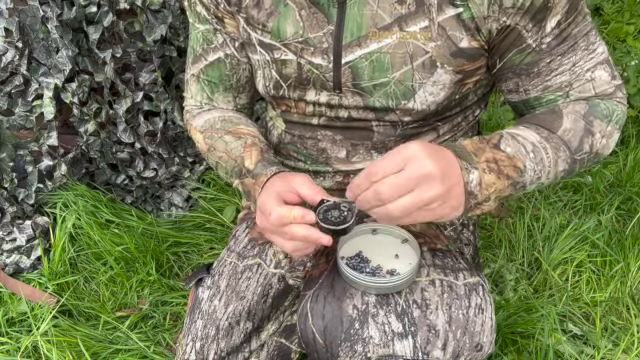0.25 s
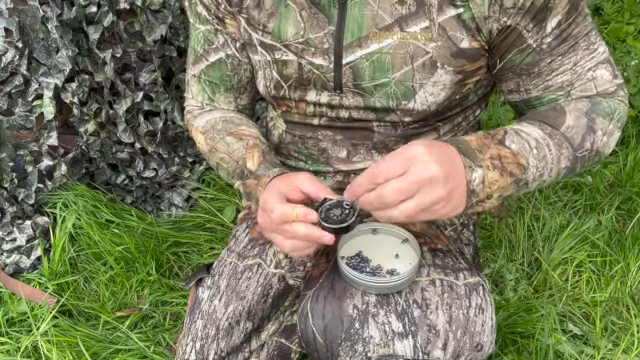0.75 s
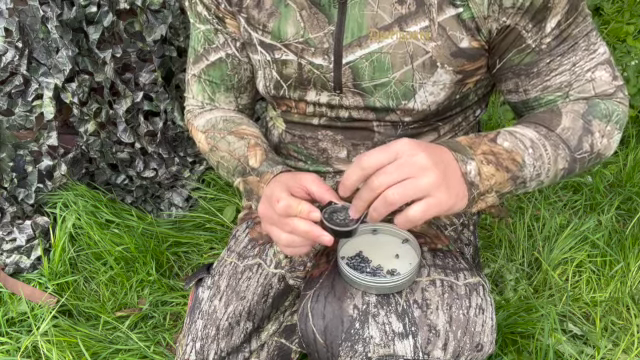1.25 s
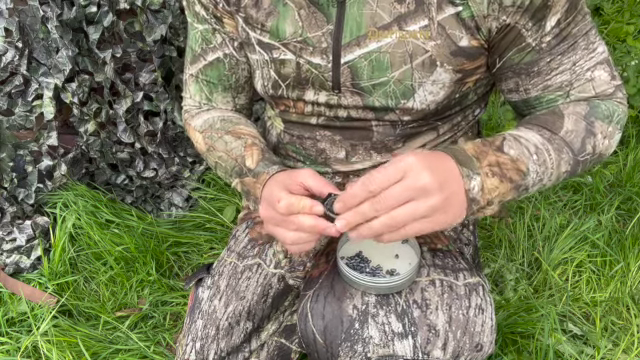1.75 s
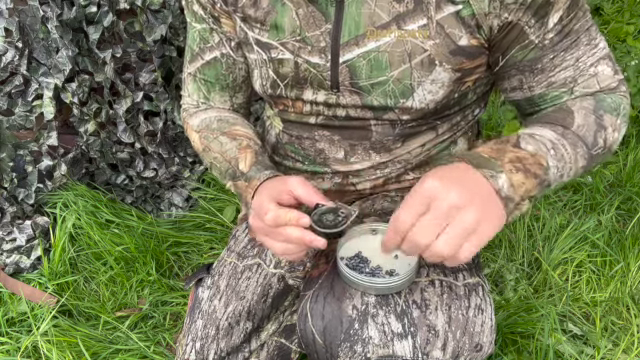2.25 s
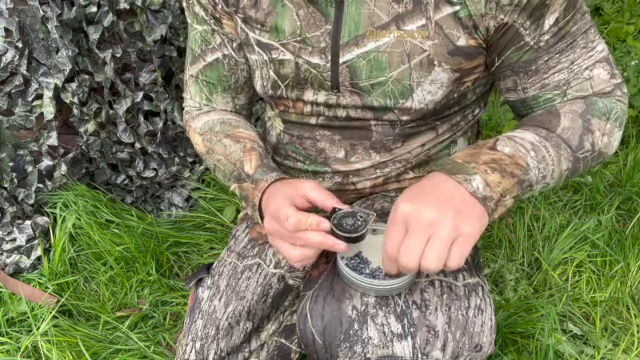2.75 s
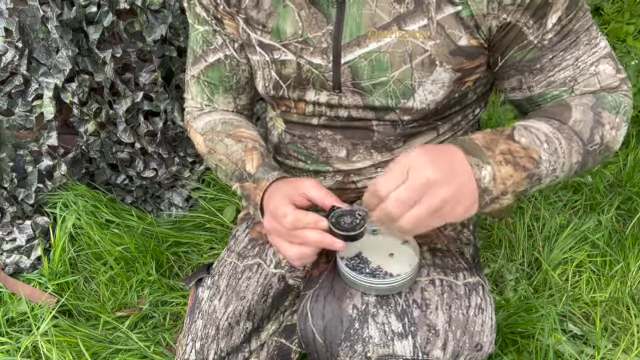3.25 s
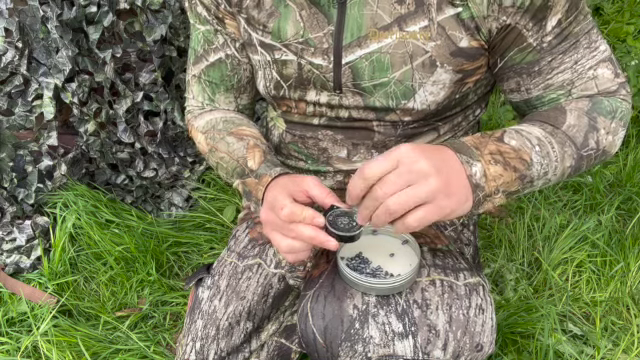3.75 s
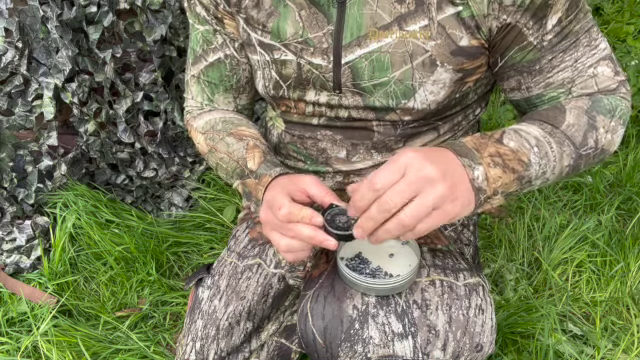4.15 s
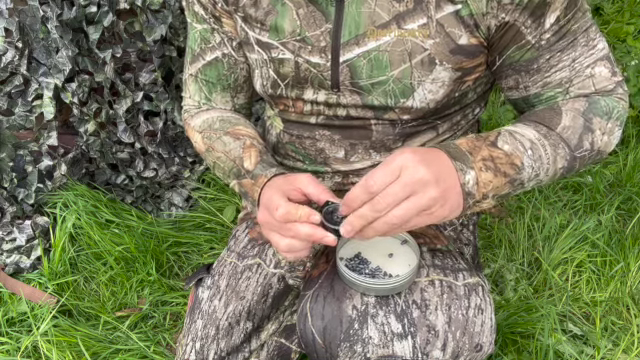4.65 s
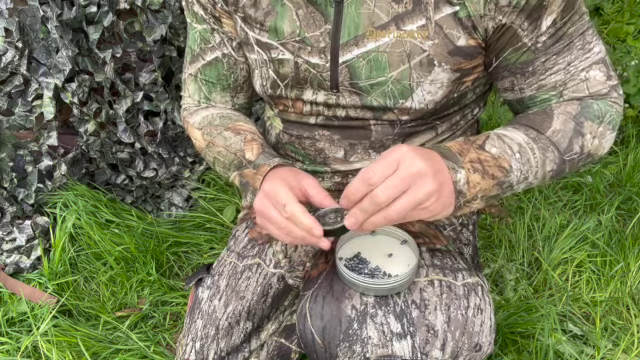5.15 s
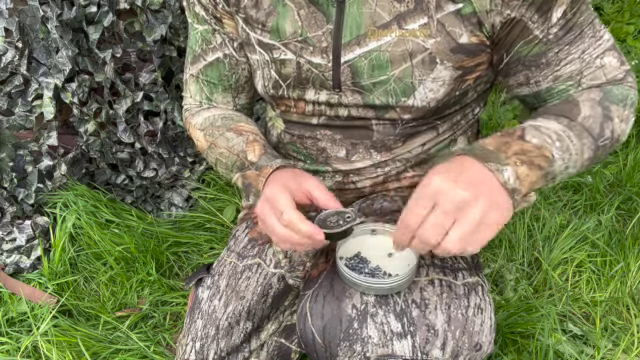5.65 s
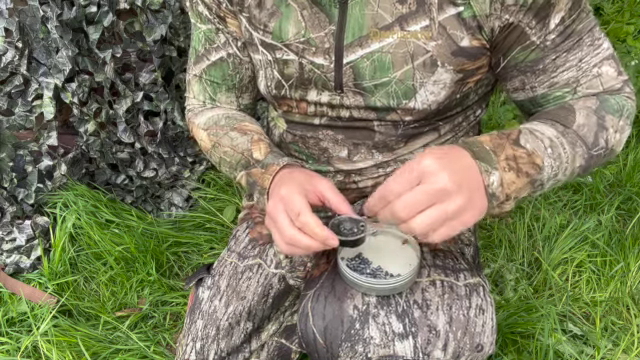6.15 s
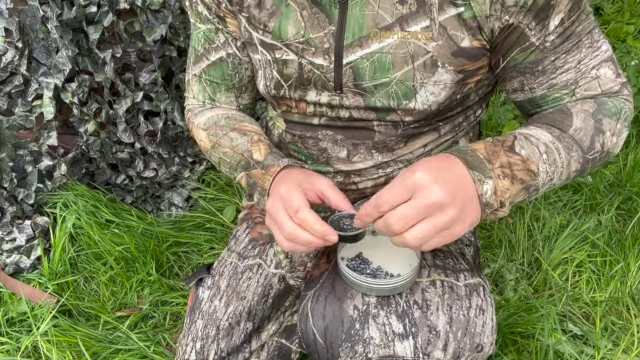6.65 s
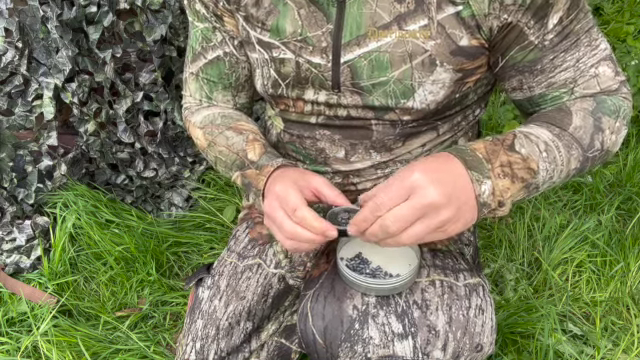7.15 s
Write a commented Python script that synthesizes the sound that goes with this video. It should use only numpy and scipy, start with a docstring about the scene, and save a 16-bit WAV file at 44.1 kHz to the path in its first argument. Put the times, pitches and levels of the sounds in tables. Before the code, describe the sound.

A quiet outdoor countryside scene in stereo, about 7.4 seconds long. Throughout, low wind rumbles softly on the microphone over a faint, broad, distant road hush, while far birds twitter with a diffuse hedge echo. From 0 to 1.3 s a near small bird gives quick chips and short gliding whistles. Around 1.4 s a tight cluster of tiny dry clicks comes from a pellet being pushed into a plastic magazine, alongside trills. Two clear, louder whistles follow at 1.7 and 2.1 s, then trills and faint harsh notes until about 3.3 s. Song thins; light ticks fall near 3.8 s and a sharper click at 4.3 s, with faint chips and a barely audible pigeon cooing from 3.8 to 5.4 s. Faint ticks come near 5.9 to 6.3 s, a crisp cluster at 6.6 s. Bright whistles return from 6.8 s to the end.

```python
"""Small birds sing from a hedge: whistles, trills and chips are gliding near-sines, chatter is sweeps with breath.
A seated person thumbs lead pellets into a plastic magazine: scrape bursts ring its decaying partials.
Far birds twitter in wavering tones, mostly as scattered hedge echoes, and a pigeon coos faintly.
Low shaped noise is wind rumbling on the microphones; broad drifting noise is a distant road hush."""
import sys
import numpy as np
from scipy import signal
from scipy.io import wavfile
from scipy.ndimage import uniform_filter1d

SR = 44100
rng = np.random.default_rng(int(sys.argv[2]) if len(sys.argv) > 2 else 0)


def wav_out(sig):
    """Save sig, one row per channel (or a flat mono array), as 16-bit PCM at SR to the path in sys.argv[1]."""
    wavfile.write(sys.argv[1], SR, np.round(np.clip(np.atleast_2d(sig).T, -1, 1) * 32767).astype(np.int16))


N = 325899

# Whistled notes; turn and loudest are counted from the start, pan is left over right:
# start_s, length_s, turn_s, loudest_s, first_hz, turn_hz, last_hz, level_db, pan_db, left_lead_us
WHISTLE_NOTES = [ (0.0, 0.081, 0.045, 0.037, 2710, 2250, 2130, -50.5, 10, 59),
                 (0.423, 0.033, .015, 0.012, 7280, 7400, 7360, -52.5, 1, -39),
                 (0.509, 0.091, 0.019, 0.026, 6880, 6720, 6790, -59, -9, -2),
                 (0.59, .43, 0.2, 0.069, 6800, 7040, 7190, -74.5, 3.5, -26.5),
                 (0.591, 0.18, 0.16, 0.14, 2146, 2147, 2280, -53.5, 14, -144),
                 (0.831, 0.18, 0.054, 0.14, 2600, 2237, 2204, -51, 12, 87),
                 (0.838, 0.1, 0.032, 0.036, 3750, 3840, 3834, -66, 6.5, 100),
                 (0.886, 0.13, 0.099, 0.17, 1776, 2140, 2140, -43.5, 2, 79),
                 (1.061, 0.071, 0.056, 0.06, 2188, 2222, 2006, -41.5, 4, 54.5),
                 (1.135, 0.043, 0.011, .015, 2160, 2140, 1690, -56, 9, 54),
                 (1.076, 0.046, 0.021, 0.018, 2750, 2630, 2440, -57, 6, -2),
                 (1.14, 0.1, 0.025, 0.022, 3170, 3120, 3050, -64.5, 2, -60.5),
                 (1.073, 0.11, 0.033, 0.018, 3640, 3760, 3420, -70, 3, 2.5),
                 (1.147, 0.11, 0.063, 0.12, 2660, 2535, 2534, -50, 7, -11),
                 (1.213, 0.12, 0.053, 0.058, 2206, 2304, 2030, -42.5, 2.5, 19),
                 (1.334, 0.05, 0.026, 0.038, 4360, 4900, 4700, -54, 4, -29),
                 (1.698, 0.16, 0.038, 0.078, 2455, 2341, 2590, -32.5, -1, 44.5),
                 (2.1, 0.17, 0.031, 0.094, 2380, 2347, 2576, -32, 0, 34),
                 (2.082, 0.24, 0.075, .048, 1995, 1943, 1793, -58, -6, 156.5),
                 (2.289, 0.18, 0.058, 0.22, 1514, 1765, 1925, -59, 2, 144),
                 (2.427, 0.074, 0.037, 0.079, 1962, 2336, 2193, -43, 2.5, 28),
                 (2.463, 0.05, 0.025, 0.03, 3520, 2600, 2450, -49, 2.6, -100),
                 (2.574, 0.17, 0.044, 0.043, 1800, 1655, 1750, -60.5, 3, 167),
                 (2.795, 0.15, 0.098, 0.066, 1870, 2802, 2630, -50, 5.5, -4),
                 (2.949, 0.069, .03, 0.019, 2730, 2588, 2490, -54, 2, -2),
                 (3.003, .13, 0.026, 0.033, 2490, 2426, 2970, -49.5, 4.5, -29),
                 (3.155, 0.054, 0.015, 0.021, 2440, 2397, 2462, -47.5, -6.5, 0),
                 (3.156, 0.055, 0.034, 0.015, 4860, 4790, 4790, -50, 7, -1),
                 (3.196, 0.15, 0.072, 0.056, 4300, 4260, 4080, -68.5, 1, -31),
                 (3.246, 0.092, 0.012, 0.013, 3350, 3630, 3360, -53.5, 5.5, 111),
                 (4.109, 0.065, 0.04, 0.021, 7590, 6660, 5170, -66.5, 1, -55),
                 (4.221, 0.086, 0.041, 0.036, 1910, 2083, 2120, -57, 4, 94),
                 (4.452, 0.091, 0.036, 0.04, 2110, 2213, 2147, -54, 1, 34),
                 (4.571, 0.065, 0.028, 0.038, 2820, 2970, 2180, -59.5, 4, -7),
                 (4.724, 0.2, 0.11, 0.015, 2073, 1970, 1900, -67, 9, -67),
                 (4.961, 0.073, 0.049, 0.045, 2700, 2095, 2360, -69.5, 2, 40),
                 (4.99, 0.097, 0.062, 0.1, 8300, 8700, 7450, -81.5, -2, -7),
                 (5.026, 0.08, 0.037, 0.1, 2420, 3090, 2210, -58.5, 4, -44),
                 (5.084, 0.13, 0.045, 0.068, 7650, 8350, 8550, -76, 0, -8),
                 (5.109, 0.17, 0.11, .03, 2410, 2410, 2430, -76, 11, -1),
                 (5.163, 0.13, 0.079, 0.055, 7600, 8100, 7650, -79, 1, -14),
                 (5.212, .18, .11, .03, 8600, 8450, 9100, -85, 0, -8),
                 (5.598, 0.065, 0.025, .015, 2760, 2160, 1940, -67.5, 3, 13),
                 (5.656, 0.11, 0.048, 0.13, 2020, 2860, 2200, -59, 2, 30),
                 (6.13, 0.13, 0.022, 0.1, 2130, 2474, 1790, -57.5, 8, 87),
                 (6.373, 0.051, 0.03, 0.023, 2600, 2620, 2930, -67.5, 9, 0),
                 (3.157, 0.058, .025, 0.028, 2880, 2810, 2910, -60.5, 7, 0),
                 (3.159, 0.061, .025, .025, 5280, 5250, 5300, -65, 2, -2),
                 (5.08, 0.17, 0.11, .06, 1890, 1794, 1740, -73, 10, 6),
                 (1.215, 0.14, 0.03, 0.042, 4450, 4640, 4320, -77, 4, -3),
                 (1.616, 0.094, 0.025, 0.022, 2750, 2630, 2580, -59.5, 9.5, 2),
                 (6.417, 0.16, 0.023, 0.059, 2436, 2272, 2274, -55.5, 13, 88),
                 (6.154, 0.1, 0.022, 0.069, 2610, 2900, 2080, -61, 0, 7),
                 (6.768, 0.062, 0.0097, 0.053, 1740, 1897, 2090, -52.5, 0, 109),
                 (6.867, 0.072, 0.065, 0.0081, 2680, 1908, 2093, -37.5, 2.5, 55),
                 (6.938, 0.039, 0.025, 0.03, 2060, 2486, 2470, -35.5, -0.5, 51),
                 (0.079, 0.023, 0.0084, .012, 2100, 2120, 2550, -51.5, 12, 92),
                 (0.104, 0.033, 0.013, 0.016, 1980, 2104, 2620, -51, 7, 95),
                 (0.141, 0.026, 0.0099, 0.01, 1990, 2140, 2310, -51, 8.6, 95),
                 (7.146, 0.096, 0.038, 0.039, 4440, 4460, 4360, -77.5, -0.5, 5),
                 (7.134, 0.11, 0.096, 0.11, 2200, 2180, 1967, -40.5, 5.5, 30),
                 (7.342, 0.043, 0.024, 0.048, 2490, 2720, 3100, -43, 6, -80),
                 (7.379, 0.045, 0.011, 0.0046, 2440, 2443, 2410, -33, -1.5, 42), ]
# Trilled notes, the whistle columns and then: beats_per_s, swing_hz (negative turns the arches over), throb (0-1)
TRILL_NOTES = [ (0.21, 0.12, 0.053, 0.067, 3000, 2950, 2680, -53.5, 3, -106, 43.8, -230, 0.24),
               (4.882, 0.09, 0.024, 0.018, 4330, 4000, 4230, -69.5, 2, 42, 70, 60, .6),
               (0.228, 0.12, 0.069, 0.09, 2080, 2514, 2473, -50.5, 7, 70, 166, 35, 0.35),
               (1.306, 0.083, 0.027, 0.076, 2087, 2137, 2330, -42, 3.5, 33, 40.8, 187, 0.49),
               (1.379, 0.054, 0.016, 0.032, 2290, 2380, 2306, -34, -1, -30, 40.7, 47, 0.22),
               (1.38, 0.2, 0.055, 0.1, 3265, 3090, 2940, -44, 2.5, -135, 90.5, 27, .1),
               (1.579, 0.35, 0.05, 0.022, 3060, 2930, 3194, -57.5, 7, -135, 92, 30, .1),
               (1.396, 0.063, 0.015, 0.035, 9300, 8720, 8620, -55.5, -1.5, -11.5, 128, 54, .5),
               (1.472, 0.022, 0.012, 0.0074, 8800, 8700, 8570, -75, -2, -13, 127, 49, .5),
               (1.498, 0.12, 0.059, 0.078, 2440, 2540, 2360, -47.5, 5, 54, 44.7, 39, 0.5),
               (1.494, 0.118, 0.076, 0.041, 1990, 2072, 1892, -41.5, 1.5, 76, 45, 65, 0.59),
               (1.898, 0.13, 0.048, 0.092, 2203, 2145, 2063, -38.5, 1.5, 61.5, 43.5, 73.5, 0.28),
               (2.406, 0.048, 0.029, 0.021, 2696, 3460, 3110, -41, 5, -148, 91, 44, 0.26),
               (2.481, 0.11, 0.053, 0.031, 2103, 2155, 2140, -42, 2.5, 61, 45.7, 135, 0.3),
               (2.503, 0.079, .04, .045, 2700, 3070, 2760, -52.5, 3, -100, 46.7, 262, 0.18),
               (2.63, 0.067, 0.039, 0.018, 2340, 3170, 2850, -40.5, 2.5, -87, 96, 48.5, 0.2),
               (2.668, 0.09, 0.039, 0.085, 1773, 1852, 1730, -49.5, 1, 104, 68.7, 55, 0.27),
               (2.906, 0.12, 0.063, 0.048, 6870, 6500, 6500, -54, -3.5, -44, 425, -190, 0.3),
               (3.041, 0.097, 0.066, 0.015, 6380, 6300, 6150, -53.5, -5.5, -51, 433, -190, 0.32),
               (3.25, 0.11, 0.025, 0.01, 7240, 7070, 7100, -62, -2, -42, 103, 74, 0.52),
               (3.28, 0.13, 0.029, 0.046, 2860, 3090, 2820, -63, 6, 25, 76.3, 100, 0.29),
               (3.638, 0.071, 0.062, 0.02, 3840, 4000, 4050, -65.5, 0, 48, 111, 95, 0.46),
               (3.727, 0.07, 0.013, 0.028, 4000, 3830, 3750, -67.5, 0, 59, 110, 92.6, 0.42),
               (3.93, 0.13, .053, 0.15, 6940, 6700, 6500, -75, 4, -52, 120, 109, .1),
               (4.14, 0.063, 0.013, 0.01, 3770, 3910, 3850, -65.5, -2, 68, 95, 40, .1),
               (4.274, 0.33, 0.051, 0.02, 2013, 1994, 2125, -64.5, 5, 98, 96, 79, 0.27),
               (4.105, 0.41, 0.1, 0.1, 1868, 2487, 2770, -68, 5, -43, 92, 80, 0.59),
               (4.53, 0.097, 0.03, 0.034, 2128, 2088, 2140, -57.5, 3, 62, 44.5, 96, 0.43),
               (5.531, 0.067, 0.02, 0.0097, 4140, 3650, 4490, -52, 6, 109, 114, 80, 0.46),
               (5.589, 0.12, 0.092, 0.015, 2900, 3770, 3760, -56.5, 4, 83, 44, 93, 0.17),
               (6.53, 0.29, 0.082, 0.033, 2210, 2110, 1884, -62.5, 6, 97.5, 99, 40, 0.67),
               (6.605, 0.049, 0.029, .025, 2780, 2700, 2680, -64, 4, 2, 91.4, 50, 0.36),
               (6.815, 0.064, 0.058, 0.012, 2380, 3040, 3170, -44, 4, -51, 84, 50.5, 0.44),
               (7.074, 0.081, 0.019, 0.053, 2036, 2060, 2222, -42, 4.5, 51, 78.5, 100.5, 0.47), ]
# Quick glides; the falling ones bottom out at end_hz and hook back up:
# start_s, length_s, first_hz, end_hz, level_db, pan_db, left_lead_us
CHIP_NOTES = [(.039, 0.011, 4130, 4700, -57.5, 4, 40), (0.074, .012, 3870, 4500, -62, 4, 40),
              (.09, 0.011, 3950, 4730, -57, 6, 40), (0.102, .015, 4070, 4950, -62, 4, 40),
              (0.131, 0.015, 3820, 4340, -58, 4, 40), (0.147, 0.016, 3800, 4360, -58, 6, 40),
              (0.187, 0.039, 3560, 3820, -63, 4, 40), (4.912, .018, 3460, 3600, -70, 0, 40),
              (4.938, 0.024, 3680, 2870, -68.5, 0, 40), (0.401, 0.017, 5180, 5450, -59, 3, -73),
              (0.638, 0.036, 3450, 4170, -75, 9, 46), (0.67, 0.022, 4240, 3200, -72, 3, 42),
              (4.515, .016, 3750, 3380, -56, 3, 92), (4.214, 0.028, 5400, 4720, -65, 1, -70),
              (4.265, 0.028, 4720, 4070, -67, 4, 67), (4.272, 0.03, 3780, 3320, -59, 2, 90),
              (4.356, 0.024, 3750, 3330, -63.5, 3, 71), (4.431, 0.017, 3710, 3460, -61.5, 5, 67),
              (4.461, 0.037, 4140, 4330, -67, 2, 61), (4.492, 0.021, 3750, 3470, -50, 5, 98),
              (4.513, 0.028, 3250, 3060, -59, 4, 68), (4.556, 0.023, 3750, 3280, -60, 5, 74),
              (5.712, .028, 4200, 4290, -62, 5, 85), (5.86, 0.022, 4200, 4400, -71, 1, 43),
              (5.887, 0.024, 4150, 4500, -71, 1, 43), (5.917, 0.023, 4150, 4560, -70.5, 1, 43),
              (5.947, 0.021, 4320, 4500, -70.5, -1, 43), (6.32, 0.019, 3900, 4660, -74, 7, -90),
              (6.346, 0.02, 3240, 4200, -70, 9, 127), (6.419, 0.016, 4200, 4300, -69, 7, -81),
              (6.432, 0.021, 3920, 4750, -75, 7, -81), (6.544, 0.028, 3750, 4700, -71, 3, -88),
              (6.646, 0.028, 3750, 4920, -69, 2, -77), (6.684, 0.022, 3320, 4870, -73, -3, -99.5),
              (6.765, 0.025, 3630, 4660, -65, 7, -104), (6.791, 0.01, 2130, 2730, -42.5, 3, 48),
              (6.801, .012, 2160, 2770, -46, 4, 53), (6.87, 0.035, 3570, 4850, -65, 4.5, -93),
              (7.045, 0.018, 3400, 4120, -69, 7, 101)]
# Fast chatter, and at 1.409 s the rattle of pellets in the magazine: start_s, length_s, centre_hz, sweep_hz (up
# +, down -), syllables_per_s, level_db, breath (0-1)
CHATTER = [(.02, .3, 4180, 1000, 55.2, -67.5, 0.85), (0.412, 0.024, 8060, -1600, 80.5, -70, .5),
           (0.496, 0.044, 6960, -1200, 57.6, -64.5, 0.57), (.765, 0.068, 2280, 999, 63.6, -63.5, 0.27),
           (1.051, 0.13, 3440, -700, 42.4, -68.5, 1), (1.52, 0.08, 4300, 1219.5, 59.8, -70, 0.87),
           (1.659, 0.095, 4400, 1502.5, 60, -71.5, 0.85), (1.899, 0.16, 3190, 902.5, 47, -60.5, 1),
           (2.042, 0.1, 5010, -1000, 58.8, -68, 1), (1.409, 0.07, 5970, 3799, 131, -64, 0.8),
           (4.225, 0.14, 4250, -900, 54, -68, 0.58), (4.44, 0.084, 3940, 898, 49, -68, 0.75),
           (2.641, 0.085, 4760, 1198, 92, -76, 0.68), (3.152, 0.1, 6440, 2007, 107, -69.5, 0.97),
           (3.359, 0.11, 3860, 597, 53.5, -65, 0.88), (6.806, 0.16, 3095, 686.5, 70.7, -58, 0.79),
           (7.069, 0.073, 2840, 598, 82, -62, 0.55), (7.173, 0.1, 5020, 1400, 74, -72.5, 0.85)]
# Faint overtones of every sung tone: multiple, relative_db
SYRINX_OVERTONES = [(2, -45), (3, -54)]
# Harsh calls: start_s, length_s, turn_s, loudest_s, first_hz, turn_hz, last_hz, level_db
HARSH_CALLS = [(2.411, .095, .04, 0.024, 920, 1137, 1038, -65.5),
               (2.634, .075, 0.049, 0.038, 853, 1090, 1030, -76)]
# Upper overtones of the harsh calls: multiple, relative_db
HARSH_OVERTONES = [(4, 0), (5, -9), (6, -14), (7, -13), (8, -13)]
# Pellet ticks, the last three relative to the high ring: start_s, high_peak_db, middle_db, low_knock_db, top_edge_db
PELLET_TICKS = [(1.412, -52, 4, 0, -4), (1.424, -39, -12, -22, -4), (1.4347, -49, -12, -2, -14),
                (1.448, -47.5, 10, 0, -24), (1.469, -45, 6.5, -2, -11), (3.805, -61, 5, 7, -1),
                (3.858, -50.5, 0, 7.5, -35), (3.872, -47, -26, -8, -42), (4.3125, -36.5, -2, -6, -20),
                (4.3177, -53, 7, -2, -33), (4.322, -49, -7, -4, -30), (4.338, -55, 6, 8, -16),
                (5.8334, -67, 10, 1, 1), (5.882, -57, -15, -12, -8), (6.0651, -54, -34, -7, 0),
                (6.0672, -49, 3, 9, -20), (6.082, -61, -5, 14, -6), (6.3007, -62, 2, 6, -30),
                (6.5873, -62, 0, 7, -5), (6.596, -49, -5, -6, -7), (6.5986, -37, -2.5, -9, -14),
                (6.607, -44, -1, -10, -28), (6.6132, -51.5, 5, 6.5, -7)]
# Rings of the plastic magazine, grouped as high, middle, low and top edge: pitch_hz, relative_db, t60_s
MAGAZINE_RINGS = [
    [(6520, 2.5, 0.012), (6780, 9.5, 0.0065), (5400, -9, 0.016), (7430, 12.5, 0.0019)],
    [(3950, -9.5, 0.011), (4280, 2.5, 0.004)],
    [(1150, -19, 0.011), (1820, 11.5, 0.0036), (2370, -9.5, 0.0091), (2990, -13.5, 0.025)],
    [(8860, -3, 0.015), (9370, 7, .004), (11050, -12, 0.0055), (13200, -14, 0.0065)],
]
# Path of the far chorus: time_s, level_db, pitch_centre_hz
CHORUS_PATH = [(0, -63.5, 4206), (0.351, -64.5, 4007), (0.52, -70.5, 3258), (0.8, -70.5, 3055),
               (1.05, -74.5, 3595), (1.298, -65, 3498), (2, -64, 3605), (2.299, -65.5, 3892),
               (2.898, -61, 3479), (3.45, -69, 3808), (3.6, -72, 3890), (4.098, -74, 3795),
               (4.6, -68.5, 3516), (5, -69.5, 3874), (5.453, -73, 4040), (5.902, -71, 3488),
               (6.3, -77, 3690), (6.751, -74, 3750), (7.4, -70.5, 3580)]
# Kinds of far bird: pitch_factor (on the centre), relative_db
FAR_BIRD_KINDS = [(.66, 8.5), (0.781, 2.5), (.88, 3.5), (0.969, -4), (1.028, 6.5), (1.121, -3),
                  (1.251, -7.5), (1.749, -23)]
# Pigeon coos: start_s, length_s, level_db
PIGEON_COOS = [(3.817, 0.24, -74.5), (4.074, 0.16, -69), (4.263, 0.14, -77.5), (4.417, 0.38, -74.5),
               (4.964, 0.15, -71), (5.193, 0.19, -73)]
# Wind rumble colour: frequency_hz, relative_db
WIND_COLOUR = [(12, -51), (20, -24.5), (40, -6.5), (59, 9), (72, -3.5), (140, -16), (220, -26),
               (290, -58.5), (480, -120)]
# Wind strength: time_s, level_db
WIND_GUSTS = [(0, -54), (2.8, -57), (6, -54.5), (6.7, -57), (7.4, -56.5)]
# One gust that knocks higher in pitch: centre_s, spread_s, level_db
WIND_BUFFET = (4.5, 0.063, -63.5)
# Colour of the road hush: frequency_hz, relative_db
HUSH_COLOUR = [(76, -35), (130, -8), (360, -14.5), (593, -11.5), (859, -6), (1090, -5.5), (1700, -15.5),
               (2470, -20.5), (3260, -42.5), (3990, -31.5), (4980, -35), (6820, -33.5), (7770, -40.5),
               (8840, -40.5), (10800, -46.5), (14100, -55.5), (22000, -120)]
# Slow level changes of the hush: time_s, change_db
HUSH_LEVELS = [(0, 1.5), (1.5, 2.5), (3, 0.5)]
# Left-right likeness of the hush: frequency_hz, likeness (-1 to 1)
HUSH_LIKENESS = [(60, 0.37), (130, -0.44), (260, 0.82), (550, -0.29), (1140, -0.61), (2380, -0.034),
                 (4980, -0.44), (10400, 0.92)]
# Left-right tilt of hush and wind: frequency_hz, left_over_right_db
NOISE_BALANCE = [(60, -2), (110, 3.5), (190, -1.5), (330, -1.5), (590, 2.5), (1050, 5), (1860, 4.5),
                 (3310, -3.5), (5860, -1), (10400, 0)]

# Each note swells from RISE_DB below its peak and fades to FADE_DB; higher bends hug the peak longer
RISE_DB, RISE_BEND, FADE_DB, FADE_BEND = -10, 3.3, -6, 1.72
TURN_SHARE = 0.25  # share of a note over which its turn is rounded
HOOK_AT, HOOK_BACK = 0.52, 0.59  # where in a falling chip it turns, and the share of the fall it climbs back
NOTE_EDGE_S = 0.0045
COO_EDGE_HZ, COO_TURN_HZ, COO_TOP_SHARE = 368, 389, 0.62
HUSH_DB = -63.5
HEDGE_T60_S, HEDGE_DB = 0.31, -9.5
TICK_T60_S, TICK_ECHO_DB = 0.045, -2.5  # echoes off the lap and the grass
TOP_EDGE_HZ = 15800


def singers():
    """Near birds: syrinx whistles, trills and chips, plus rattling chatter; one rattle of pellets rides along."""
    out = np.zeros((2, N))
    for *shape, pan_db, lead_us in WHISTLE_NOTES:
        add(out, *note(shaped(*shape), pan_db, lead_us, edge_s=NOTE_EDGE_S))
    for *shape, pan_db, lead_us, beats, swing_hz, throb in TRILL_NOTES:
        add(out, *note(shaped(*shape), pan_db, lead_us, beats, swing_hz, throb, edge_s=NOTE_EDGE_S))
    for s, length, first_hz, end_hz, db, pan_db, lead_us in CHIP_NOTES:
        rows = [(s, first_hz, db), (s + length, end_hz, db)]
        if end_hz < first_hz:
            hook_hz = end_hz + HOOK_BACK * (first_hz - end_hz)
            rows[1:] = [(s + HOOK_AT * length, end_hz, db), (s + length, hook_hz, db)]
        add(out, *note(rows, pan_db, lead_us, edge_s=0.0038))
    for row in CHATTER:
        add(out, *buzz(*row))
    return out


def note(rows, pan_db, lead_us, beats=0, swing_hz=0, throb=0, flutter=0.25, edge_s=0.002):
    """A near sine from the syrinx; trills arch in pitch and throb in level on one beat; moving air flutters it."""
    s, hz, db = np.transpose(rows)
    t = np.arange(s[0], s[-1], 1 / SR)
    beat = 2 * np.pi * beats * np.cumsum(1 + 0.066 * wobble(len(t), span=500)) / SR

    arches = 2 * abs(np.sin(beat / 2)) - 4 / np.pi  # averages zero over a beat
    jitter_hz = (8 + 0.23 * abs(swing_hz) + 0.13 * beats) * wobble(len(t), span=60)
    pitch = np.interp(t, s, hz) + swing_hz * arches + jitter_hz

    throb = np.clip(throb, 0, 1)
    flutter = flutter * np.clip((-34.0 - db.max()) / 20, 0.3, 1.1)  # faint notes come through more air
    level = (1 - throb * np.cos(beat)) / np.sqrt(1 + throb ** 2 / 2)
    level *= 1 + flutter * wobble(len(t), span=150)
    level *= gain_of(np.interp(t, s, db))
    level *= np.clip(np.minimum(t - s[0], s[-1] - t) / edge_s, 0, 1)

    # The left phase runs ahead by the lead time
    turn = 2 * np.pi * (np.cumsum(pitch) / SR + np.outer([1, 0], pitch) * lead_us / 1e6)
    tone = np.sin(turn) + sum(gain_of(over_db) * np.sin(k * turn) for k, over_db in SYRINX_OVERTONES)
    sides = gain_of(np.array([[0.5], [-0.5]]) * pan_db)
    return s[0], np.sqrt(2) * tone * level * sides / np.sqrt(np.mean(sides ** 2))


def shaped(s, length, turn_s, loud_s, first_hz, turn_hz, last_hz, db):
    """Rows (time_s, pitch_hz, level_db): pitch glides through a rounded turn while level swells and fades."""
    t = np.arange(0, length + 0.001, 0.002)
    loud_s, turn_s = np.clip([loud_s, turn_s], 0.002, length - 0.002)
    swell = RISE_DB * np.clip(1 - t / loud_s, 0, 1) ** RISE_BEND
    fade = FADE_DB * np.clip((t - loud_s) / (length - loud_s), 0, 1) ** FADE_BEND
    # A hyperbola joins the two straight glides
    before, after = (turn_hz - first_hz) / turn_s, (last_hz - turn_hz) / (length - turn_s)
    bend = TURN_SHARE * length / 2
    corner = np.hypot(t - turn_s, bend) - bend / 2
    hz = turn_hz + (before + after) / 2 * (t - turn_s) + (after - before) / 2 * corner
    return np.transpose([s + t, hz, db + swell + fade])


def buzz(s, length, hz, sweep_hz, syllables, db, breath):
    """A rattle of tiny uneven sweeps, mixed with breath noise over the same range."""
    t = np.arange(0, length, 1 / SR)
    place = np.cumsum(syllables * (1 + 0.56 * wobble(len(t), span=400))) / SR % 1  # within a syllable
    pitch = hz + sweep_hz * (place - 0.5 + 0.076 * wobble(len(t), span=300))
    swell = np.sin(np.pi * place) ** 2
    sweeps = swell * np.sin(2 * np.pi * np.cumsum(pitch) / SR)
    edges = [hz - abs(sweep_hz) / 2, hz + abs(sweep_hz) / 2]
    band = signal.butter(4, edges, "bandpass", fs=SR, output="sos")
    puffs = signal.sosfilt(band, (1.0 + swell) * rng.standard_normal((2, len(t))))
    breath = np.clip(breath, 0, 1)
    rasp = np.sqrt(1 - breath) * evened(sweeps) + np.sqrt(breath) * evened(puffs)
    sides = gain_of(db + 2.0 * np.array([[1], [-1]]))
    return s, sides * rasp * signal.windows.tukey(len(t), 0.5)


def harsh():
    """A harsh call stacks high overtones that arch together, rasping into noise toward the top."""
    out = np.zeros((2, N))
    for row in HARSH_CALLS:
        for k, db in HARSH_OVERTONES:
            rows = shaped(*row) * [1, k, 1] + [0, 0, db]
            s, tone = note(rows, 4, 2, beats=110, swing_hz=14 * k, throb=0.33, flutter=0.46)
            clean = (HARSH_OVERTONES[0][0] / k) ** 3  # the lowest stays a pure tone
            rasp = np.sqrt(1 - clean ** 2) * wobble(tone.shape[1], span=20)
            add(out, s, tone * (clean + rasp))
    return out


def pellets():
    """Each pellet tick is a tiny burst of scrapes that rings the magazine's decaying partials."""
    t, out = np.arange(2000) / SR, np.zeros(N)
    rise = 1 - np.exp(-t / 0.0003)  # the contact is soft, so no ring starts abruptly
    rings = []
    for group in MAGAZINE_RINGS:
        partials = sum(gain_of(db - 60 * t / t60) * np.sin(2 * np.pi * hz * t) for hz, db, t60 in group)
        rings.append(rise * partials)
    all_scrapes = rng.standard_normal((len(PELLET_TICKS), len(rings), 64))
    for (s, db, *rel_db), scrapes in zip(PELLET_TICKS, all_scrapes):
        for ring, part_db, scrape in zip(rings, [0] + rel_db, scrapes):
            sound = np.convolve(ring, scrape * np.hanning(64))
            add(out, s, gain_of(db + part_db) * sound / abs(sound).max())
    return np.array([out, np.roll(out, 1)])  # right lags by one sample


def hedge(x, t60, top_hz=5000):
    """Scattered echoes from leaves and trunks: sparse, dulled taps of random sign that die away."""
    length = SR // 2
    taps = np.zeros((2, length))
    at = np.arange(400, length - 20, 20) + rng.integers(0, 20, (2, (length - 401) // 20))
    np.put_along_axis(taps, at, rng.choice([-1., 1.], at.shape), 1)
    taps *= gain_of(-60 * np.arange(length) / SR / t60)
    taps = signal.lfilter(*signal.butter(1, top_hz, fs=SR), taps / np.linalg.norm(taps[0]))
    return signal.oaconvolve(x, taps, axes=1)[:, :N]


def chorus():
    """Far birds twitter in short wavering syllables, mostly heard through the hedges."""
    s, db, hz = np.transpose(CHORUS_PATH)
    t, out = np.arange(N) / SR, np.zeros((2, N))
    for factor, bird_db in FAR_BIRD_KINDS * 3:  # three birds of each kind
        waver = 1 + 0.08 * wobble(N, span=600) + 0.025 * wobble(N, span=200)
        pitch = factor * np.interp(t, s, hz) * waver
        # Only the crests of a fast and a slow wobble sound
        syllables = np.clip(wobble(N, span=500) + 0.45 * wobble(N, span=4000) - 0.8, 0, 1)
        turn = 2 * np.pi * (np.cumsum(pitch) / SR + rng.random((2, 1)))
        out += gain_of(bird_db) * syllables * np.sin(turn)
    far = gain_of(-11) * evened(out) + evened(hedge(out, t60=0.25))
    return evened(far) * gain_of(np.interp(t, s, db) + 2 * np.array([[1], [-1]]))


def pigeon():
    """Soft far coos: low near-sines whose pitch arches with level, fluttering strongly."""
    out = np.zeros((2, N))
    for s, length, db in PIGEON_COOS:
        top = COO_TOP_SHARE * length
        rows = shaped(s, length, top, top, COO_EDGE_HZ, COO_TURN_HZ, COO_EDGE_HZ, db)
        add(out, *note(rows, -8.5, 100, flutter=0.78, edge_s=0.0078))
    return out


def wind():
    """Lumpy low rumble, nearly alike on both sides, and one brighter buffet of band noise."""
    s, db = np.transpose(WIND_GUSTS)
    t = np.arange(N) / SR
    likeness = [(40, 0.92), (130, 0.97)]  # frequency_hz, likeness
    rumble = noise(WIND_COLOUR, likeness, size=4096, patchy_db=1.5) * gain_of(np.interp(t, s, db))
    at, spread, buffet_db = WIND_BUFFET
    band = signal.butter(2, [130, 280], "bandpass", fs=SR, output="sos")
    knock = evened(signal.sosfilt(band, rng.standard_normal(N))) * np.exp(-((t - at) / spread) ** 2)
    return rumble + gain_of(buffet_db) * knock


def hush():
    """Far road, leaves and microphone hiss as one broad shaped noise whose level drifts."""
    s, db = np.transpose(HUSH_LEVELS)
    drift = np.interp(np.arange(N) / SR, s, db)
    return noise(HUSH_COLOUR, HUSH_LIKENESS, size=1024, patchy_db=2.03) * gain_of(HUSH_DB + drift)


def noise(spectrum, same, size, patchy_db):
    """Two-channel noise of rms 1 from random short-time spectra with drifting patches."""
    frames, hz = N // (size // 4) + 5, np.fft.rfftfreq(size, 1 / SR)
    a, b, c, d, patches = rng.standard_normal((frames, len(hz), 5)).T
    patches = uniform_filter1d(uniform_filter1d(patches, size=14, axis=0), size=12, axis=1)
    same = np.clip(read(same, hz), -1, 1)[:, None]
    left = a + 1j * b
    right = same * left + np.sqrt(1 - same ** 2) * (c + 1j * d)
    z = np.array([left, right])
    z *= gain_of(read(spectrum, hz)[:, None] + patchy_db * evened(patches))
    z *= gain_of(np.outer([0.5, -0.5], read(NOISE_BALANCE, hz)))[:, :, None]
    return evened(signal.istft(z, nperseg=size, noverlap=size * 3 // 4)[1][:, :N])


def wobble(length, span):
    """Smooth random motion of about rms 1 that changes over span samples."""
    step = span // 5
    x = rng.standard_normal(length // step + 30)
    x = evened(uniform_filter1d(uniform_filter1d(x, size=5), size=5))
    return np.interp(np.arange(length) / step + 10, np.arange(len(x)), x)


def gain_of(db):
    """Decibels to gain."""
    return 10 ** (np.asarray(db) / 20)


def evened(x):
    """Scales to rms 1."""
    return x / np.sqrt(np.mean(x ** 2) + 1e-20)


def read(points, hz):
    """Reads a spectrum on a log-frequency axis."""
    f, value = np.transpose(points)
    return np.interp(np.log(hz + 1), np.log(f + 1), value)


def add(mix, s, sound):
    """Mixes a sound in at s seconds."""
    part = mix[..., round(s * SR):][..., :sound.shape[-1]]
    part += sound[..., :part.shape[-1]]


def scene():
    """Birds and ticks with their echoes, over far birds, pigeon, wind and hush."""
    birds, ticks = singers() + harsh(), pellets()
    bird_echoes = gain_of(HEDGE_DB) * hedge(birds, HEDGE_T60_S, top_hz=3480)
    tick_echoes = gain_of(TICK_ECHO_DB) * hedge(ticks, TICK_T60_S)
    return birds + ticks + bird_echoes + tick_echoes + chorus() + pigeon() + wind() + hush()


def record(dry):
    """The microphones lose the deepest bass; a steep low-pass then limits the treble."""
    x = signal.lfilter(*signal.butter(2, 32, "highpass", fs=SR), dry)
    low_pass = signal.firwin(511, TOP_EDGE_HZ, window=("kaiser", 9), fs=SR)
    return signal.oaconvolve(x, low_pass[None], "same")


dry = scene()
out = record(dry)
wav_out(out)
```